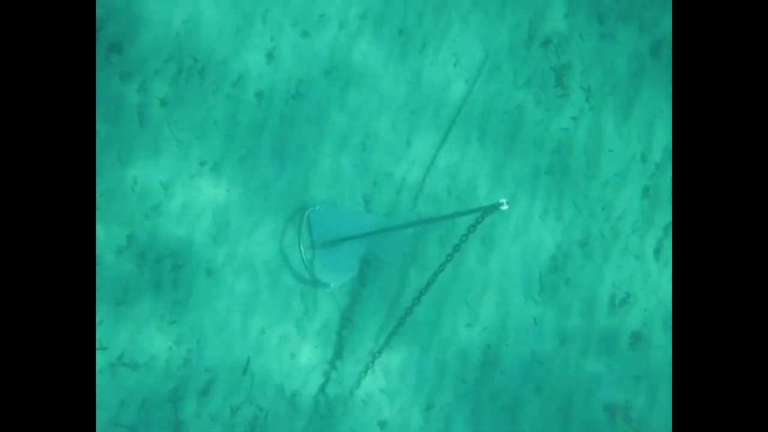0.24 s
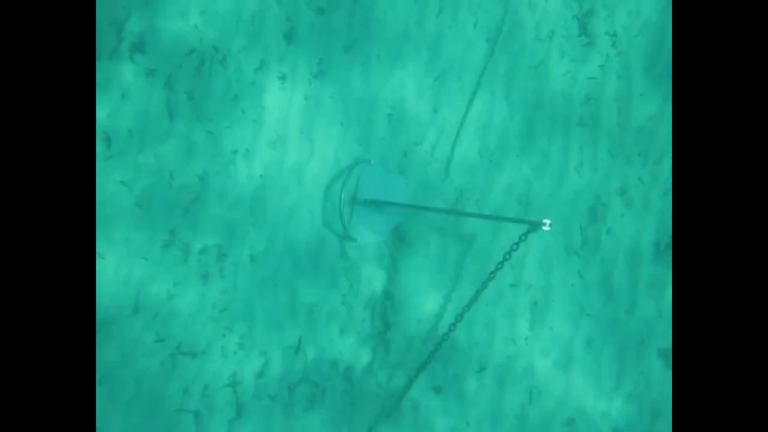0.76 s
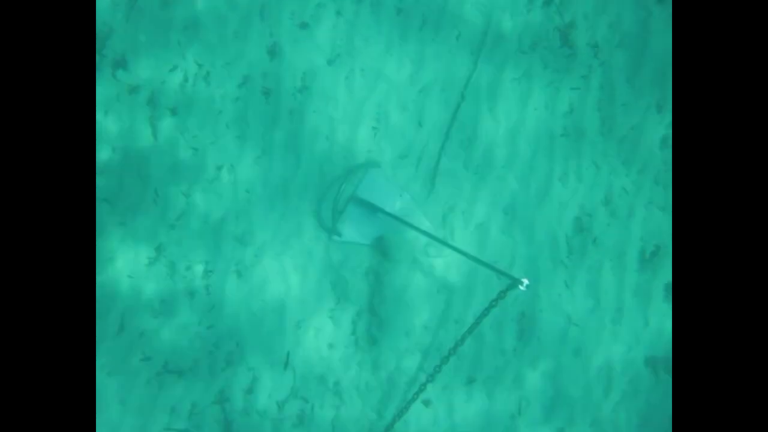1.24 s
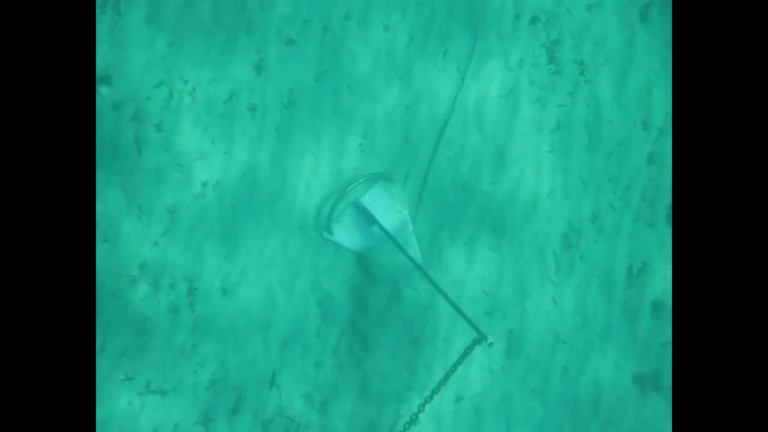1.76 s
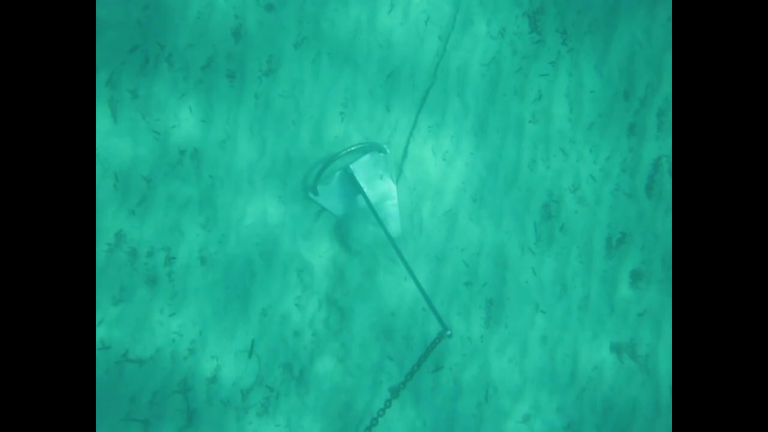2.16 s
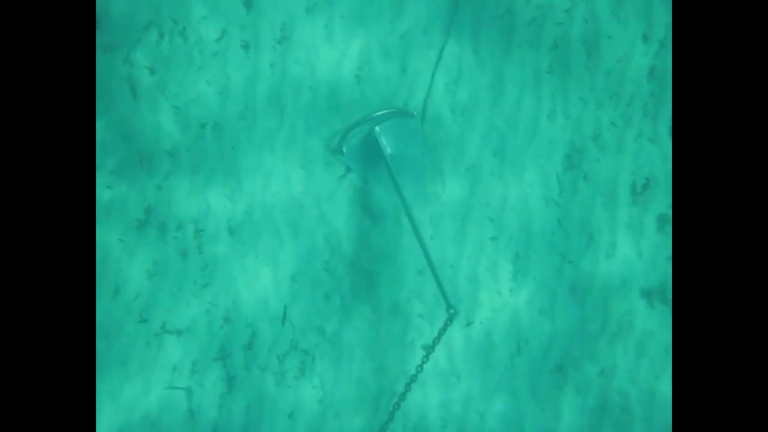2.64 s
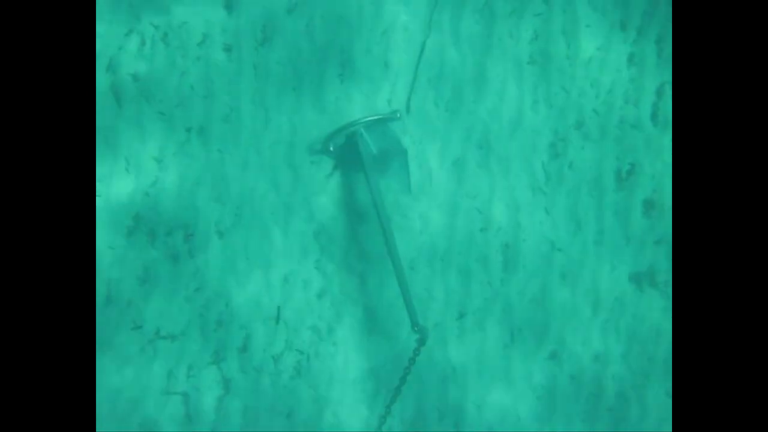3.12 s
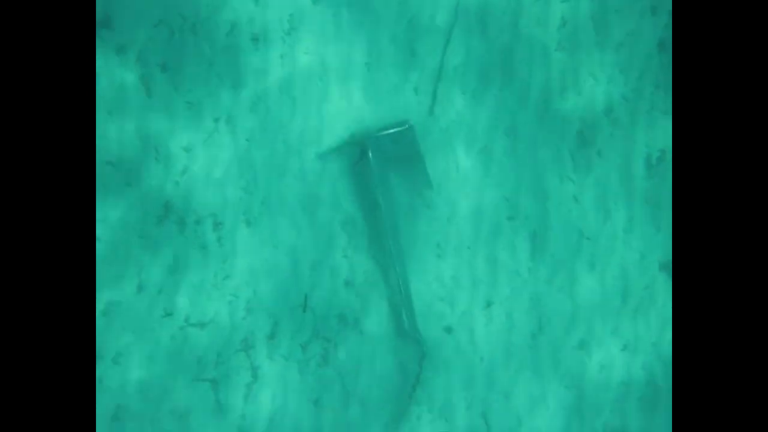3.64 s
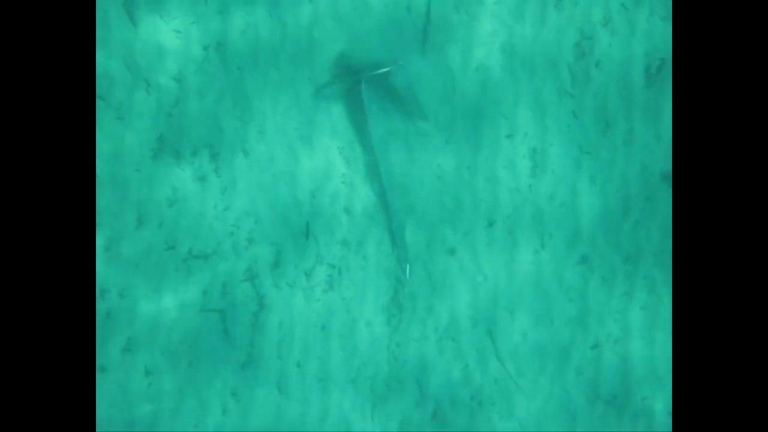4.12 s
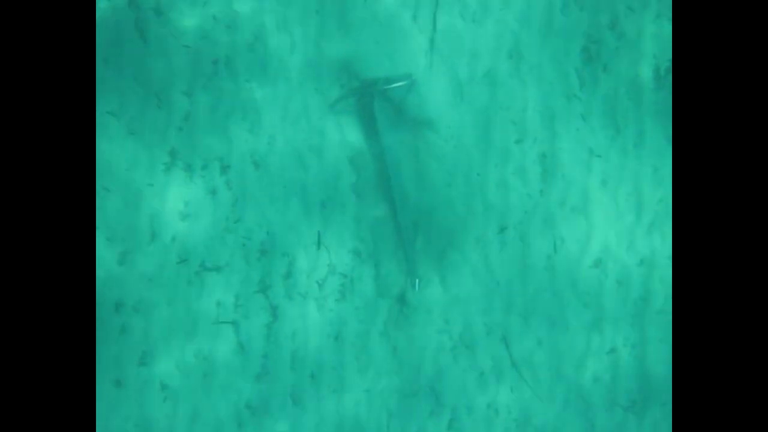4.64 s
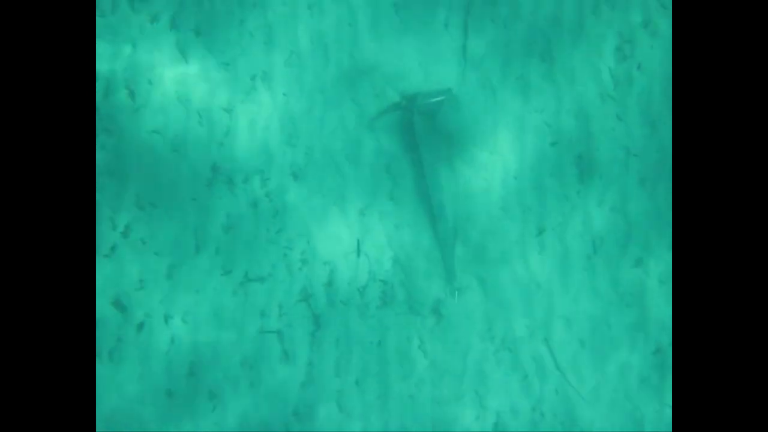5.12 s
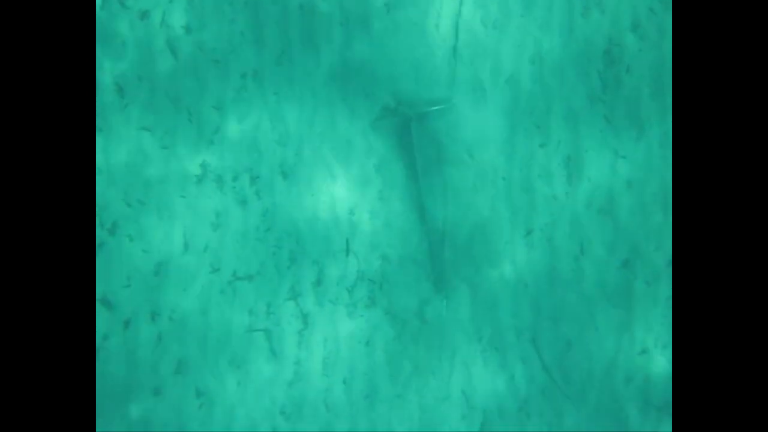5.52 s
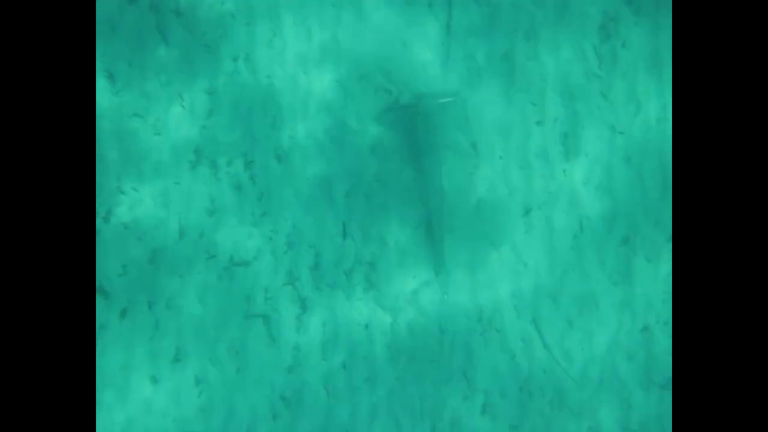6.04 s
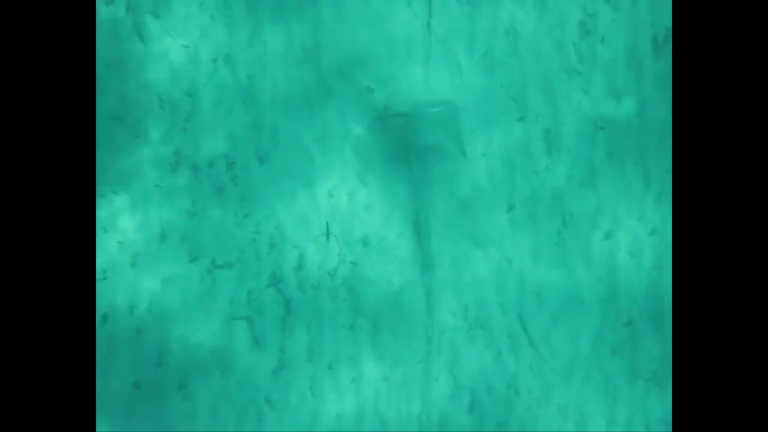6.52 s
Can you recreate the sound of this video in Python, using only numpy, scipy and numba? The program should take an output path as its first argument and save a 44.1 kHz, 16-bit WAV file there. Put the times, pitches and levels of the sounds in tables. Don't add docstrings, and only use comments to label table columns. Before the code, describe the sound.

Heard from inside a sealed case underwater, a boat engine and propeller roar steadily with a hollow mid-low ring. Water thuds, bumps and burbles against the case, with hard overloaded knocks early on and near three seconds. Two wet falling squelches follow, then a sharp clink of anchor chain and a few fainter ones. The drone continues to the end with more bumps around six seconds.

```python
import sys
import numpy as np
from scipy import signal
from scipy.fft import rfft, irfft, next_fast_len
from scipy.io import wavfile
from scipy.ndimage import uniform_filter1d
from numba import njit

SR = 44100
rng = np.random.default_rng(int(sys.argv[2]) if len(sys.argv) > 2 else 0)


def rack_gain(trim_db):
    fader = np.asarray(trim_db, float)
    return 10 ** (fader / 20)


def dump(signal):
    limited = np.clip(np.atleast_2d(signal).T, -1, 1)
    pcm = np.round(limited * 32767).astype(np.int16)
    wavfile.write(sys.argv[1], SR, pcm)


N = 298557


def evened(x):
    return x / np.sqrt(np.mean(x ** 2) + 1e-20)


def curve(rows):
    s, *columns = np.transpose(rows)
    return [np.interp(np.arange(N) / SR, s, c) for c in columns]


def colour(x, points):
    size = next_fast_len(len(x) + 4096)
    f, db = np.transpose(points)
    shape = np.interp(np.log(np.fft.rfftfreq(size, 1 / SR) + 1), np.log(f + 1), db)
    return irfft(rfft(x, size) * rack_gain(shape), size)[:len(x)]


def resonate(x, hz, width_hz):
    pole = np.exp((2j * np.pi * hz - np.pi * width_hz) / SR)
    return 2 * signal.lfilter([1 - abs(pole)], [1, -pole], x).real


def flutter(per_s, depth_db):
    slow = signal.lfilter(*signal.butter(2, per_s, fs=SR), rng.standard_normal(N))
    return rack_gain(depth_db * evened(slow))


def add(mix, s, sound):
    part = mix[max(round(s * SR), 0):][:len(sound)]
    part += sound[:len(part)]


def swell(t, tau_s):
    return t / tau_s * np.exp(1 - t / tau_s)


# f/Hz, width/Hz, level/dB
HOUSING_MODES = [(441, 50, -7), (478.9, 37.8, 4.5), (525.55, 32, 2.5), (562.2, 36, -3), (606.2, 36, -4.5),
                 (637.5, 30, -4), (680.8, 36, -14.5), (743.7, 56, -12.5), (808.5, 71, -16)]
# t/s, level/dB
UPPER_SHARE = [(0, 3), (.5, 2), (1, 0.8), (1.4, 2.8), (2, -1.5), (2.35, -0.2), (2.7, 1.5), (3.25, 3),
               (3.6, -4), (4, 1), (4.5, -0.3), (4.8, 0.5), (5.2, 2.4), (5.7, -3), (6.2, -1.3), (6.77, -1.7)]


def cavity(churn):
    upper = rack_gain(curve(UPPER_SHARE)[0])
    water = rng.standard_normal(N)
    modes = np.zeros(N)
    for k, (hz, width_hz, db) in enumerate(HOUSING_MODES):
        shaken = np.roll(water, k * N // len(HOUSING_MODES)) * churn
        ring = resonate(resonate(shaken, hz, width_hz), hz, 1.6 * width_hz)
        share = upper if hz > 590 else 1
        modes += share * rack_gain(db) / np.sqrt(width_hz) * ring
    return colour(modes, [(300, -0.5), (400, -3), (850, -2.5), (1000, 0.5)])


# t/s, level/dB
ENGINE_EFFORT = [(0, -0.5), (.4, 0), (.8, -1), (1.2, -0.5), (1.7, -0.7), (2.1, -0.5), (2.5, -0.5),
                 (2.9, -1), (3.3, -2.5), (3.7, 0), (4.1, -1), (4.5, 0), (4.9, 0.6), (5.3, -1.1), (5.7, -1),
                 (6.1, -2), (6.45, -1.2), (6.77, -0.4)]
# f/Hz, level/dB per Hz
RUMBLE_COLOUR = [(12, -48), (20, -7.5), (54, -9), (102, -12.5), (184, -11.5), (283, -13.5), (308, -8),
                 (380, -6.5), (490, -37.5), (840, -120)]
# f/Hz, level/dB per Hz
HISS_COLOUR = [(530, -2), (900, -4), (1090, -9), (1290, 2.5), (1750, -20), (2000, -3), (2750, -23.5),
               (3230, -8), (4000, -27), (5140, -11), (6370, -43), (7810, -27.5), (15600, -47)]
# f/Hz, width/Hz, level/dB rms
WALL_MODES = [(1236, 37, -44.5), (2030, 51, -68), (2290, 31, -55), (3230, 180, -72.5), (4370, 96, -65),
              (5460, 870, -57), (7900, 420, -70)]


def engine(duck_db, cavity_db):
    drone_db, drone_follow = -15, 0.45
    hiss_db, hiss_follow = -51.5, 3.2
    effort_db, = curve(ENGINE_EFFORT)
    churn = flutter(per_s=43.8, depth_db=2.5)
    drone = evened(cavity(churn))
    rumble = evened(colour(rng.standard_normal(N), RUMBLE_COLOUR)) * flutter(per_s=11.0, depth_db=-3.8)
    wash = rng.standard_normal(N) * churn ** 0.24 * flutter(per_s=24, depth_db=2.0)
    hiss = evened(colour(wash, HISS_COLOUR))
    walls = sum(rack_gain(db + 39.5) * evened(resonate(wash, hz, w)) for hz, w, db in WALL_MODES)
    low = rack_gain(drone_db + drone_follow * effort_db + cavity_db) * drone
    low = low + rack_gain(-47 + 0.4 * cavity_db) * rumble
    return low + rack_gain(hiss_db + hiss_follow * effort_db + duck_db) * (hiss + walls)


# f/Hz, level/dB rms
WHINE_TONES = [(7822, -85), (7852, -78), (7882, -78), (7912, -86), (10250, -94), (12600, -91)]


def whine():
    t = np.arange(N) / SR
    return sum(np.sqrt(2) * rack_gain(db) * np.sin(2 * np.pi * hz * t) for hz, db in WHINE_TONES)


# t/s, peak level/dB, centre f/Hz
WATER_THUDS = [(.052, -29.5, 228), (0.746, -17, 261), (0.77, -15, 102.5), (0.929, -20.5, 323),
               (1.038, -23, 252), (1.327, -30.5, 178.7), (1.353, -20.5, 196.4), (1.395, -16.5, 174),
               (1.431, -27, 302), (1.625, -19, 181), (1.656, -26.5, 244), (1.764, -15, 266.4),
               (2.209, -12.5, 282.6), (2.379, -23.5, 248), (2.496, -27, 206), (2.921, -22, 256),
               (3.153, -17, 94.5), (3.757, -14.5, 306.6), (4.663, -20, 123), (5.307, -23.5, 277.8),
               (5.439, -28, 239), (5.886, -18, 308), (5.999, -23.5, 332), (6.035, -15, 266),
               (6.136, -18.5, 251), (6.175, -18, 275.6), (6.206, -19, 242.6), (6.23, -23, 217),
               (6.643, -29, 116), (6.701, -23, 209.6)]


def thuds():
    t60_s = 0.058
    out, t = np.zeros(N), np.arange(6000) / SR
    shape = (1 - np.exp(-t / 0.0059)) ** 2 * rack_gain(-60 * t / t60_s)
    for s, db, hz in WATER_THUDS:
        push = np.sin(2 * np.pi * hz * (t + 0.006 * (1 - np.exp(-t / 0.011))))
        rough = evened(resonate(resonate(rng.standard_normal(len(t)), hz, hz), hz, hz))
        add(out, s, rack_gain(db - 3.0) * shape / shape.max() * (0.7 * push + 0.71 * rough))
    return signal.lfilter(*signal.butter(2, 70, "high", fs=SR), out)


def blow(out, s, db, ring_ms, edge_db, edge_hz):
    t = np.arange(3000) / SR
    ring = np.sin(2 * np.pi * 500 * t) + 0.5 * np.sin(2 * np.pi * 640 * t)
    edge = np.sin(2 * np.pi * edge_hz * t)
    add(out, s, rack_gain(db - 3) * ring * swell(t, ring_ms / 1000))
    add(out, s + 0.001, rack_gain(edge_db + 3) * edge * swell(t, ring_ms / 3000))


# t/s, cavity level/dB
SOFT_BUMPS = [(0.102, -18), (.667, -4.5), (.746, -6), (1.098, -7), (1.709, -3), (1.7718, -9.5),
              (1.883, -7.5), (1.904, -8), (2.883, -9.5), (2.985, -6.2), (3.078, -18), (3.088, -19),
              (3.302, -4), (3.347, -15), (3.423, -9), (3.711, -1.5), (3.825, -9.5), (4.298, -11),
              (4.593, -11.5), (5.299, -7.5), (5.649, -1.5), (6.053, -6), (6.135, -6), (6.19, -8),
              (6.631, -12.5)]


def bumps():
    out = np.zeros(N)
    for s, db in SOFT_BUMPS:
        blow(out, s, db, ring_ms=3.1, edge_db=db - 42.5, edge_hz=1000)
    return out


# t/s, cavity level/dB, ring time/ms, edge level/dB, edge f/Hz
HARD_KNOCKS = [(.591, -8.5, 2.7, -31.5, 1310), (.909, -7.5, 3.6, -34, 1280), (.936, -0.2, 6.5, -36.5, 1370),
               (1.349, -1.9, 4.3, -31.5, 1022), (1.387, -6, 3.1, -33, 1000),
               (1.433, -7.5, 1.1, -47.5, 1040), (1.4707, 4, 2.3, -19, 1363), (1.495, -7.5, 4.1, -29, 950),
               (1.555, -7.5, 2.7, -40, 945), (2.2174, -2, 1.8, -39.5, 1290), (2.526, -9, 6.5, -23.5, 850),
               (2.964, -1.7, 3.8, -31.5, 1003), (2.977, 4.5, 2.1, -12, 1610), (3.022, -9, 1.5, -40, 890),
               (3.177, -4, 2.4, -47, 920), (3.224, -5.5, 5.4, -25.5, 928), (3.767, -1, 3.2, -34, 977),
               (5.969, 0.24, 3.9, -15.5, 923), (6.2299, -2, 2.1, -26, 1410), (6.706, -24, 7.5, -20.5, 807)]


def knocks():
    out = np.zeros(N)
    for row in HARD_KNOCKS:
        blow(out, *row)
    return out


# t/s, length/s, level/dB
WATER_BURBLES = [
    (0.743, .09, -25.5),
    (0.884, .08, -31),
    (1.317, 0.26, -24.5),
    (1.6, 0.11, -33),
    (3.162, .19, -30.5),
    (5.967, 0.11, -26),
    (6.12, 0.13, -26),
    (6.686, .07, -32.5),
]


def burble(s, length_s, db):
    ends_db, rise_share, fade_share = -13.5, 0.48, 0.1
    t, u = np.arange(0, length_s, 1 / SR), np.arange(900) / SR
    out = np.zeros(len(t))
    for at, pitch, size in rng.random((60, 3))[:round(250 * length_s)]:
        hz = 190 * 5.5 ** pitch
        bubble = np.sin(2 * np.pi * hz * u * (1 - 6 * u)) * signal.windows.hann(len(u))
        add(out, at * length_s, rack_gain(10 * size - 5 * pitch) * bubble)
    share = t / length_s
    rise = np.clip(np.minimum(share / rise_share, (1 - share) / fade_share), 0, 1)
    return s, rack_gain(db + ends_db * (1.5 - rise)) * evened(out)


# t/s, depth/dB, hold/s, share of depth felt by the ringing cavity/0-1
GAIN_DUCKS = [(.945, 12, .012, .55), (1.36, 6, .04, .4), (1.478, 14, .05, .75), (1.562, 13, .012, .95),
              (2.985, 10, .04, .55), (3.03, 15, .035, .7), (3.092, 11, .02, 1), (3.232, 6, .01, .5),
              (3.772, 11, .01, .3), (3.832, 7, .01, .3), (5.978, 4, .01, .3), (6.058, 3, .01, .3),
              (6.233, 5, .008, .6)]


def ducking():
    fall_s, recover_db_per_s = 0.02, 150
    t = np.arange(N) / SR
    dips, cavity_dips = [], []
    for s, db, hold_s, cavity_share in GAIN_DUCKS:
        corners_s = np.cumsum([s, fall_s, hold_s, db / recover_db_per_s])
        dip = np.interp(t, corners_s, [0, -db, -db, 0])
        dips.append(dip)
        cavity_dips.append(dip * cavity_share)
    return np.min(dips, axis=0), np.min(cavity_dips, axis=0)


# t/s, length/s, first f/Hz, last f/Hz, level/dB
GAP_SQUELCHES = [
    (1.47, .118, 453, 175, -12),
    (2.985, .142, 400, 110, -12.5),
    (1.64, .17, 200, 240, -30),
    (3.178, .04, 330, 130, -24),
]
# share of length/0-1, share of glide/0-1, level/dB, overtone level/dB
SQUELCH_COURSE = [
    (0, 0, 1.5, -22),
    (.2, .36, -3, -7),
    (.64, .53, -10, -6),
    (.8, .75, -19, -22),
    (1, 1, -27, -38),
]


def squelch(s, length_s, first_hz, last_hz, top_db):
    t = np.arange(0, length_s, 1 / SR)
    share, *columns = np.transpose(SQUELCH_COURSE)
    glide, db, over_db = (np.interp(t / length_s, share, c) for c in columns)
    hz = first_hz + (last_hz - first_hz) * glide
    slow = [uniform_filter1d(uniform_filter1d(v, 150), 150) for v in rng.standard_normal((2, 9000))]
    wobble, sputter = (evened(v)[:len(t)] for v in slow)
    phase = 2 * np.pi * np.cumsum(hz * (1 + 0.062 * wobble)) / SR
    tone = rack_gain(db) * np.sin(phase) + rack_gain(over_db) * np.sin(2 * phase)
    level = rack_gain(top_db + 1.2 * sputter) * signal.windows.tukey(len(t), 0.15)
    return s, np.sqrt(2) * tone * level


# t/s, peak level/dB, ring level/dB re the crack
CHAIN_CLINKS = [(3.6875, -49, -14.5), (3.7025, -28, -4), (3.7159, -47.5, -18), (3.7258, -24.5, -16),
                (3.7616, -44.5, -23), (3.7652, -9.5, -21), (3.8229, -30.5, -10), (3.8481, -40.5, -2),
                (3.9226, -34, -18), (4.0759, -36.5, -23), (4.497, -41.5, 1), (5.191, -42.5, -14.5)]
# f/Hz, level/dB, t60/s
LINK_MODES = [(1600, -3, .1), (2140, -4, .12), (2870, -11, .05), (3180, -10, .06), (4005, -9, .07),
              (4300, -7, .07), (5180, -6, .04), (7600, -20, .03), (9000, -20, .04), (10500, -24, .02)]
# f/Hz, level/dB
CRACK_COLOUR = [(150, -10), (400, 10.5), (1500, -8), (3000, -5.5), (5300, -4), (7500, -17.5),
                (11000, -24.5), (15500, -21.5), (17000, -49)]


def chain():
    out, t = np.zeros(N), np.arange(8000) / SR
    crack_shape = t / 0.002 * np.exp(1 - t / 0.0016)
    for s, db, ring_db in CHAIN_CLINKS:
        ring = np.zeros(len(t))
        for hz, mode_db, t60_s in LINK_MODES:
            shade_db = 1.1 * rng.standard_normal()
            ring += rack_gain(mode_db + shade_db - 60 * t / t60_s) * np.sin(2 * np.pi * hz * t)
        crack = colour(rng.standard_normal(len(t)) * crack_shape, CRACK_COLOUR)
        add(out, s, rack_gain(db) * (crack * 1.1 + rack_gain(ring_db - 5.5) * ring))
    return out


def scene():
    duck_db, cavity_db = ducking()
    mix = engine(duck_db, cavity_db) + rack_gain(duck_db - 2.5) * whine()
    mix += thuds() + bumps() + knocks() + chain()
    for row in WATER_BURBLES:
        add(mix, *burble(*row))
    for row in GAP_SQUELCHES:
        add(mix, *squelch(*row))
    return mix[None]


@njit
def limit(x, knee, fall, rise):
    out, gain = np.empty_like(x), 1.
    for k in range(len(x)):
        gain = gain * fall if abs(x[k] * gain) > knee else min(gain * rise, 1.)
        out[k] = gain
    return out


def low_pass(x):
    return signal.sosfilt(signal.butter(12, 15750, fs=SR, output="sos"), x)


# f/Hz, level/dB
TICK_COLOUR = [(600, -30), (1100, 0), (1600, 2), (2500, 14), (5000, 18), (15000, 18)]
# f/Hz, level/dB
PORT_DIP = [(20, 0), (5600, 0), (6300, -18), (7200, 0), (20000, 0)]


def record(dry):
    wave = dry[0]
    gain = limit(wave, 0.3, rack_gain(-0.022), rack_gain(0.002))
    kinks = colour(wave * (gain - uniform_filter1d(gain, size=40)), TICK_COLOUR) * rack_gain(-0.5)
    held = np.clip(wave * gain + kinks, -0.705, 0.705)
    return low_pass(colour(held, PORT_DIP)[None])


dry = scene()
out = record(dry)
dump(out)
```